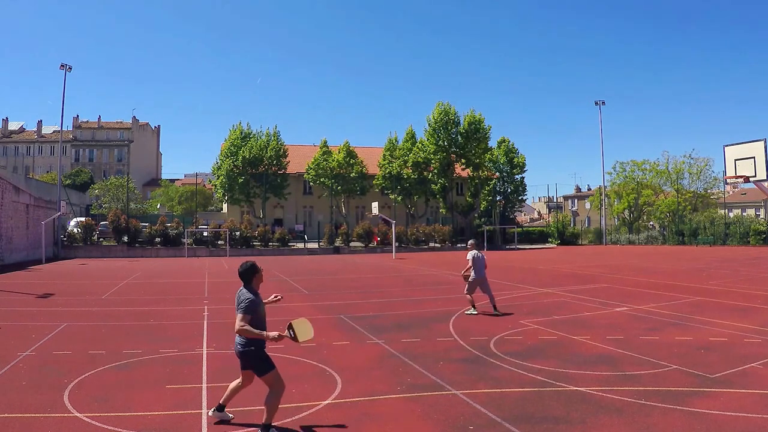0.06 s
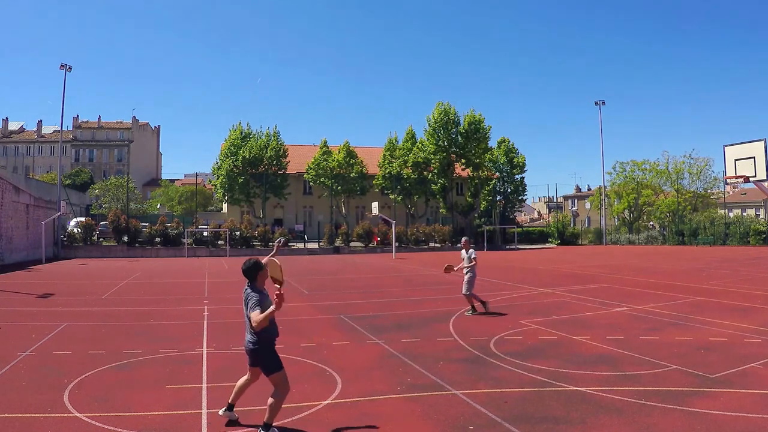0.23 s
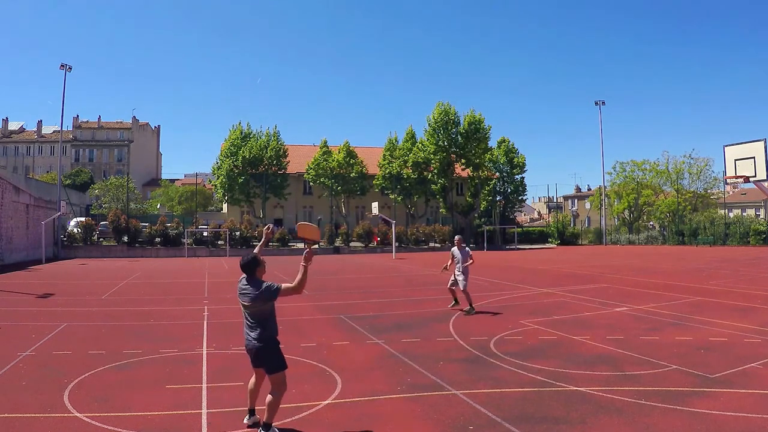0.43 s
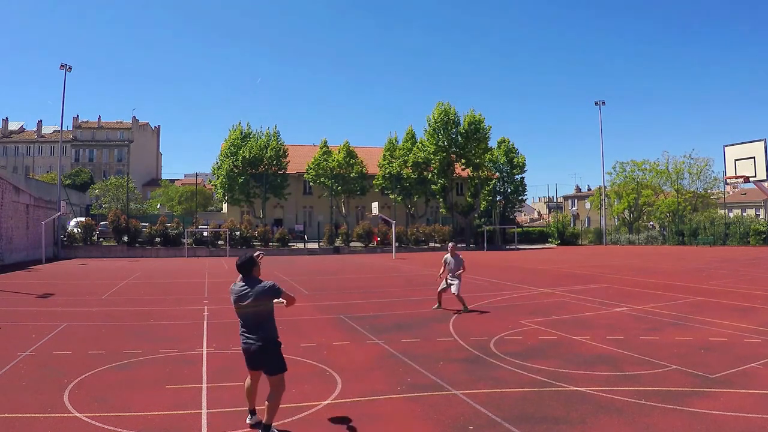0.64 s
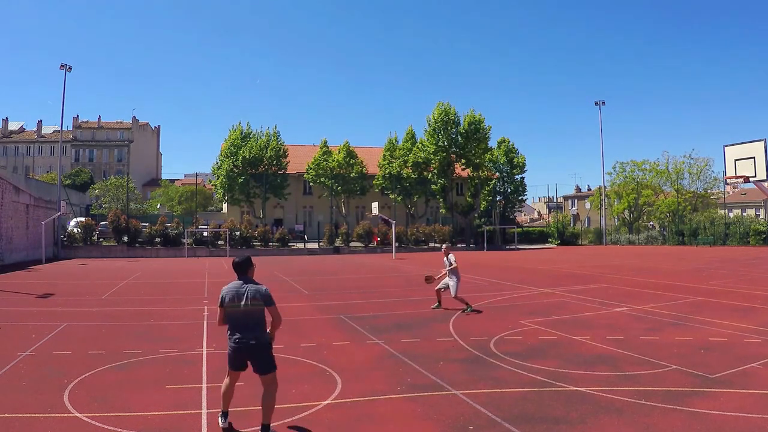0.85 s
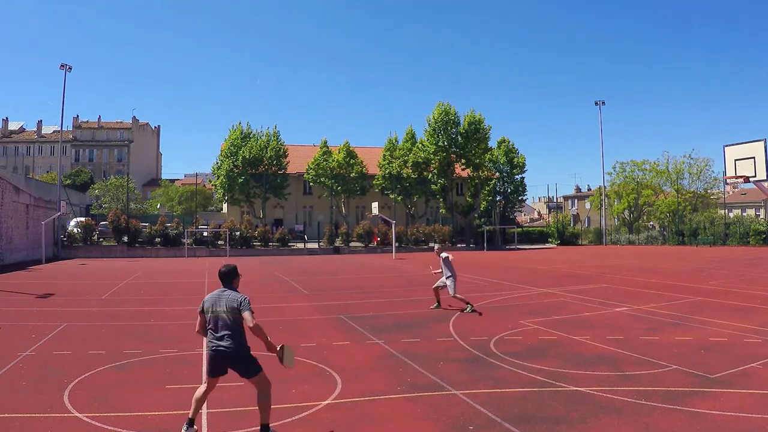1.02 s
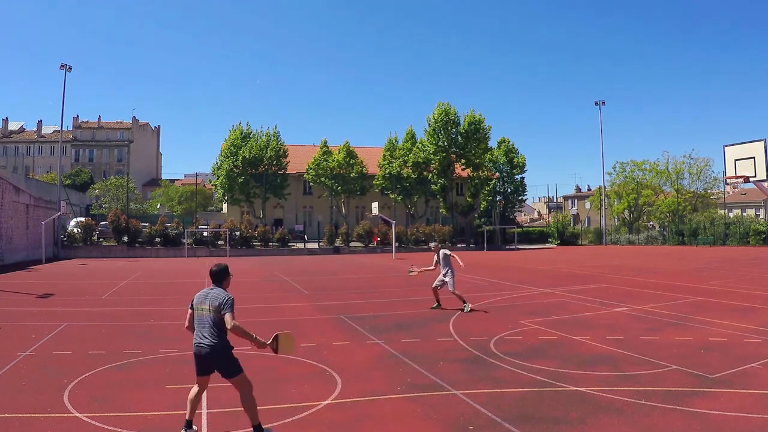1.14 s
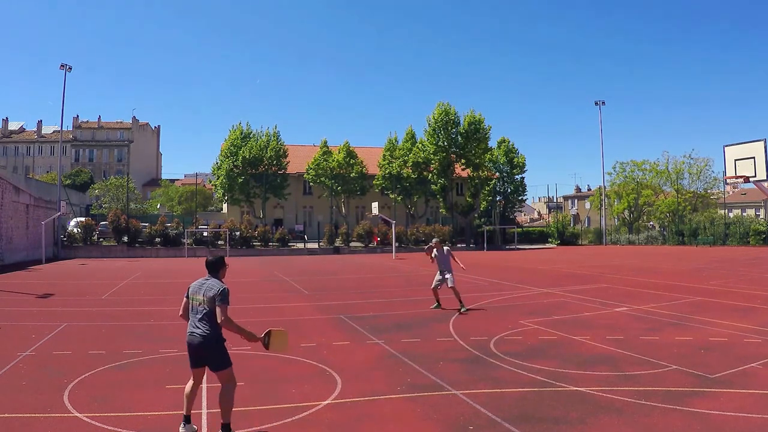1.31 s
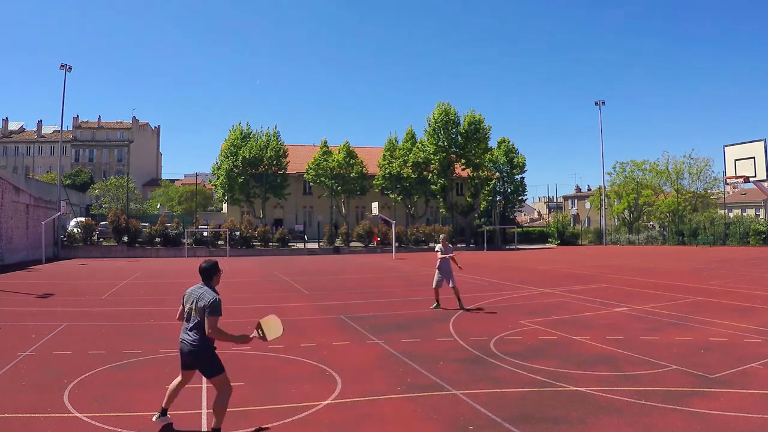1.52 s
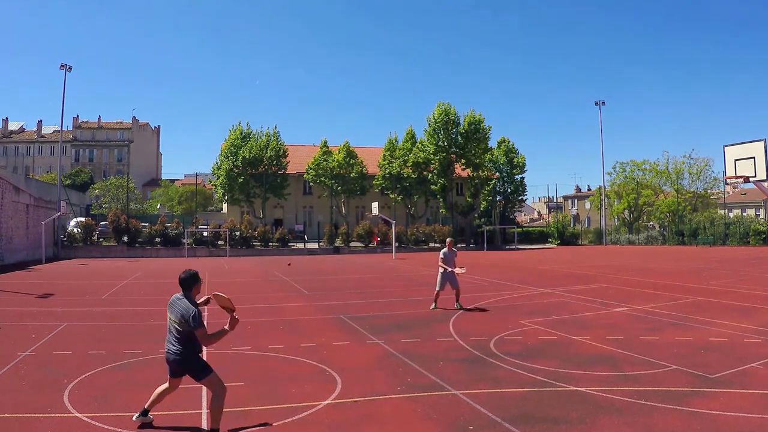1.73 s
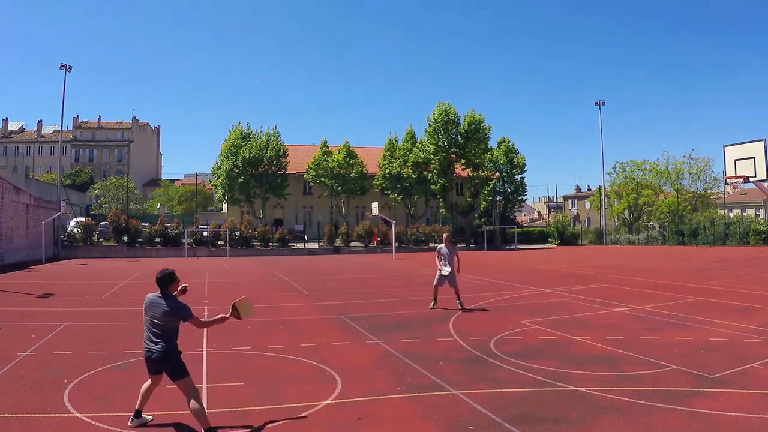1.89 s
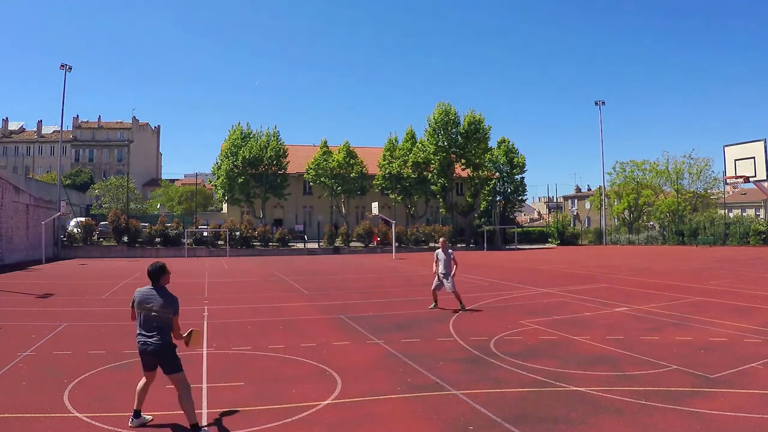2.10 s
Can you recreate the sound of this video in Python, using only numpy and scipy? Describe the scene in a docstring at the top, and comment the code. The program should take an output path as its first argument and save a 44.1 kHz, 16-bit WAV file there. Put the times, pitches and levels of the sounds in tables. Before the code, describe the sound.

Wooden paddles hit a ball back and forth in three sharp knocks, near, far, then near, each with a brief echo across an outdoor court. Gusts of wind rumble and thump on the microphone throughout.

```python
"""Two players knock a ball back and forth with hard wooden paddles on an open outdoor court.
Each stroke is a sharp crack and a short ring of the blade, thrown back by the ground and the walls around.
Gusts buffet the microphone over a faint wash of distant traffic."""
import sys
import numpy as np
from scipy import signal
from scipy.fft import rfft, irfft, next_fast_len
from scipy.io import wavfile
from scipy.ndimage import uniform_filter1d

SR = 44100
rng = np.random.default_rng(int(sys.argv[2]) if len(sys.argv) > 2 else 0)


def generate_wav(signal):
    """Clip the signal to [-1, 1] and save it as 16-bit WAV at the path in sys.argv[1]."""
    frames = np.transpose(np.atleast_2d(signal))
    scaled = np.clip(frames, -1, 1) * 32767
    pcm = np.round(scaled).astype(np.int16)
    wavfile.write(sys.argv[1], SR, pcm)


N = 94815

# strokes of the near player: (s, level dB, ring dB, blade pitch ratio, treble dB per octave, ground echo dB, near wall echo dB, far wall echo dB, court tail dB)
NEAR_STROKES = [(0.5139, 0.5, 4, 1.005, -1, -6, -10.5, -19, -19.5), (1.8719, -4, 6.5, .985, 0.28, -1.5, -4.5, -18.5, -17)]
# strokes of the far player: same columns
FAR_STROKES = [(1.2687, 0, 0, 0.96, 0, -3.5, -8.5, -15.5, -13.5)]
# what each blade rings with: (Hz, dB, t60 s)
NEAR_BLADE = [(430, -30, .03), (692, -19, .048), (900, -26, .024), (1040, -22, .026), (1510, -27, .02), (2275, -28, .02), (4565, -48, .035), (5286, -42, .012), (6770, -49, .026)]  # fixed
FAR_BLADE = [(819, -15, 0.027), (948, -25, .018), (1830, -22.5, 0.011), (4320, -55, 0.0069), (5500, -36, 0.0086), (8900, -66, .008)]
# crack of the contact: (Hz, dB)
NEAR_CRACK = [(100, 9), (250, 18), (500, 19), (950, 23.5), (1600, 18), (2400, 14.5), (3300, 5.5), (5500, 4.5), (9500, -3.5), (12500, -10.5), (15000, -16.5), (17000, -27)]
FAR_CRACK = [(100, -13.5), (300, 14.5), (600, 18.5), (1000, 14.5), (1900, 12.5), (3300, 0.5), (5500, -1.5), (9500, -14), (12500, -21), (15000, -26), (17000, -39)]
GROUND_EDGE_HZ, FAR_WALL_EDGE_HZ = 3150, 6300
# wind on the microphone: (s, level of the rumble dB, level of the flutter above it dB)
WIND = [(0.0, -36, -57), (0.02, -38, -59), (0.17, -39.5, -54), (0.23, -19, -23), (0.29, -17, -36), (0.33, -16, -24),
        (0.42, -26, -45), (0.48, -38, -52), (0.53, -25, -30), (0.6, -33, -53), (0.65, -17, -31), (0.68, -24, -44),
        (0.71, -19, -23), (0.78, -22, -48), (0.84, -23, -43), (0.93, -30, -54), (1.02, -21, -29), (1.05, -20, -41),
        (1.14, -32, -52), (1.18, -17, -34), (1.38, -26, -46), (1.41, -18, -35), (1.48, -26, -50), (1.63, -22, -47),
        (1.66, -31, -58), (1.76, -23, -45.5), (1.85, -40, -60), (1.87, -31, -38), (1.99, -35, -60), (2.15, -43, -52)]
RUMBLE = [(12, -13.5), (25, -1), (45, -1.5), (70, -6), (105, -10.5), (150, -24.5), (250, -47.5), (500, -82.5), (3000, -140)]
FLUTTER = [(60, -20.5), (120, 9.5), (170, 2.5), (250, -8), (350, -21), (500, -31), (800, -42.5), (3000, -120)]
RUMBLE_DB, FLUTTER_DB, WIND_EVEN_S = 1, -2.5, 0.035
TRAFFIC = [(60, -18.5), (250, 2.5), (500, 3), (900, -1), (1600, -7.5), (3000, -15.5), (6000, -22), (10000, -26.5), (14500, -31), (16000, -56.5)]
TRAFFIC_DB = -55.5
# shoes scuffing the court: (s, length s, dB, centre Hz)
SCUFFS = [(0.383, .11, -56, 1600), (0.733, 0.019, -57, 3430), (1.065, 0.035, -55.5, 1480), (1.451, 0.014, -56.5, 2900), (2.13, 0.11, -60, 1840)]
CUTOFF_HZ = 16200  # fixed
TIME = np.arange(N) / SR
SIZE = next_fast_len(N)
FREQS = np.arange(SIZE // 2 + 1) * SR / SIZE
# the dense upper modes of a blade: (dB against the crack, t60 s, lower edge Hz)
UPPER_MODES = (-7.5, 0.017, 3400)
TAIL_LOW_EDGE_HZ = 455
# wind on the microphone: (s, level of the rumble dB)
GUSTS = [(0.0, -40.5), (0.02, -39), (0.2, -30), (0.23, -20), (0.3, -19.5), (0.35, -15.5), (0.4, -25), (0.48, -36.5),
         (0.54, -25), (0.6, -33), (0.64, -21), (0.83, -28), (0.85, -21), (0.93, -29), (1.04, -17), (1.13, -34),
         (1.2, -19), (1.26, -33.5), (1.3, -23), (1.36, -28.5), (1.41, -19), (1.53, -35.5), (1.54, -28), (1.78, -34),
         (1.83, -43), (2.04, -36), (2.07, -40), (2.15, -43.5)]
# level of the flutter above the rumble: (s, dB)
FLUTTER_LEVEL = [(0.0, -45), (0.17, -54.5), (0.23, -20.5), (0.29, -30), (0.32, -22.5), (0.38, -29), (0.42, -42.5),
                 (0.46, -33.5), (0.48, -53), (0.51, -47.5), (0.57, -25), (0.6, -80), (0.65, -27), (0.68, -63),
                 (0.71, -17.5), (0.78, -37.5), (0.87, -33.5), (0.91, -66), (1.01, -25), (1.14, -59), (1.18, -25),
                 (1.39, -43.5), (1.41, -31), (1.46, -44), (1.63, -36), (1.65, -48), (1.84, -55), (1.87, -44.5),
                 (2.01, -75), (2.15, -49)]
# single eddies that thump the microphone: (s, peak dB, Hz)
BUFFETS = [(.233, -10, 135), (.262, -16, 85), (.329, -14, 180), (.346, -8, 42), (.368, -22, 170), (.646, -13, 80), (.710, -14, 175)]  # fixed
# echo delays of each stroke, set by where the ball is met: (ground ms, near wall ms, far wall ms)
NEAR_DELAYS = [(4.55, 11.9, 71.6), (1.3, 11.7, 68.5)]  # fixed
FAR_DELAYS = [(.95, 11.3, 64.6)]  # fixed
# reflections after every stroke, the first being the near wall's echo bounced off the ground, the rest lesser
# reflectors round the court: delays (ms), and for each (dB, treble edge Hz)
REFLECTOR_DELAYS_MS = [14.8, 20.3, 45.2, 99.0]  # fixed
REFLECTORS = [(-10.5, 3000), (-31, 5600), (-24, 2500), (-23.5, 2500)]
FAR_WALL_FOOT_DB = 0.5
FAR_WALL_FOOT_S = .003  # fixed
# diffuse sound, from things close by and from the houses round the court
SCATTER_ONSET_S, SCATTER_RISE_S, TAIL_ONSET_S, TAIL_RISE_S = .011, .002, .02, .02  # fixed
SCATTER_DB, SCATTER_T60_S, SCATTER_EDGE_HZ = 1, 0.046, 2800   # level against the near wall echo
TAIL_T60_S, TAIL_EDGE_HZ = 0.91, 4600
MS = .001  # fixed
NEAR_WALL_DB = None
NEAR_WALL_EDGE_HZ = 3100
FAR_WALL_LOW_EDGE_HZ = 170
GRIT_DB, GRIT_HZ = 2.5, 120
ECHO_RING_DB = -2   # the blade beams its ring, so the walls get less of it than of the crack
FAR_WALL_SCATTER_DB = 3
FAR_WALL_SCATTER_T60_S, FAR_WALL_SCATTER_RISE_S = .028, .001  # fixed


def from_db(db):
    """Decibels to gain."""
    return 10 ** (np.asarray(db) / 20)


def gain_curve(points):
    """Gain at every frequency from (Hz, dB) points."""
    hz, db = np.transpose(points)
    return from_db(np.interp(np.log(FREQS + 1), np.log(hz), db))


def noise(gain):
    """Coloured noise of rms 1."""
    x = irfft(rfft(rng.standard_normal(SIZE)) * gain, SIZE)[:N]
    return x / x.std()


def crack(points):
    """The shortest causal pulse with this spectrum."""
    cepstrum = irfft(np.log(gain_curve(points)), SIZE)
    cepstrum[1:SIZE // 2] *= 2
    cepstrum[SIZE // 2 + 1:] = 0
    return np.exp(rfft(cepstrum))


def echo(delay_s, db, edge_hz):
    """Response of one reflection: later, weaker and duller."""
    return from_db(db) * np.exp(-2j * np.pi * FREQS * delay_s) / (1 + 1j * FREQS / edge_hz)


def scatter(rise_s, t60):
    """Response of countless small reflections that swell and die; energy 1."""
    x = rng.standard_normal(N) * (1 - np.exp(-TIME / abs(rise_s))) * from_db(-60 * TIME / t60)
    return rfft(x / np.sqrt(np.sum(x ** 2)), SIZE)


def court(near_ms, far_ms, near_db, far_db, tail_db):
    """Slaps from the near and far walls, scatter from things close by and the tail of the court."""
    face = 1 + echo(FAR_WALL_FOOT_S, FAR_WALL_FOOT_DB, FAR_WALL_EDGE_HZ) + from_db(FAR_WALL_SCATTER_DB) * scatter(FAR_WALL_SCATTER_RISE_S, FAR_WALL_SCATTER_T60_S)
    far = echo(far_ms * MS, far_db, FAR_WALL_EDGE_HZ) * face * high_pass(FAR_WALL_LOW_EDGE_HZ) / (1 + 1j * FREQS / FAR_WALL_EDGE_HZ)
    close = diffuse(SCATTER_ONSET_S, SCATTER_RISE_S, near_db + SCATTER_DB, SCATTER_T60_S, SCATTER_EDGE_HZ)
    tail = diffuse(TAIL_ONSET_S, TAIL_RISE_S, tail_db, TAIL_T60_S, TAIL_EDGE_HZ) * high_pass(TAIL_LOW_EDGE_HZ) ** 2
    return echo(near_ms * MS, near_db, NEAR_WALL_EDGE_HZ) + far + close + tail


def paddle(strokes, delays, blade, contact, reflectors):
    """The ball cracks on the blade and sets its modes ringing; ground and walls throw the sound back."""
    out, pulse, t = np.zeros(N), crack(contact), TIME[:SR // 10]
    upper_db, upper_t60, upper_hz = UPPER_MODES
    for (s, db, ring_db, pitch, treble_db, ground_db, near_db, far_db, tail_db), (ground_ms, near_ms, far_ms) in zip(strokes, delays):
        modes = sum(from_db(level - 60 * t / t60) * np.sin(2 * np.pi * hz * pitch * t) for hz, level, t60 in blade)
        ring = -from_db(ring_db) * rfft(modes, SIZE)
        upper = from_db(upper_db) * scatter(0.00019, upper_t60) * high_pass(upper_hz) ** 2
        treble = from_db(treble_db * np.log2(1 + FREQS / 1000))  # fixed
        snap = pulse * treble * (1 + upper)
        direct = (snap + ring) * (1 + echo(ground_ms * MS, ground_db, GROUND_EDGE_HZ))
        echoes = (snap + from_db(ECHO_RING_DB) * ring) * (reflectors + court(near_ms, far_ms, near_db, far_db, tail_db))
        start = int(s * SR)
        out[start:] += from_db(db) * irfft(direct + echoes, SIZE)[:N - start]
    return out


def eddies(spectrum):
    """Low turbulence with its chance swells evened out."""
    x = noise(gain_curve(spectrum))
    return x / np.sqrt(uniform_filter1d(uniform_filter1d(x ** 2, int(WIND_EVEN_S * SR)), int(WIND_EVEN_S * SR)) + 1e-9)


def wind():
    """Gusts rumble and flutter on the microphone; each single eddy is one swing of pressure."""
    rumble = from_db(RUMBLE_DB + np.interp(TIME, *np.transpose(GUSTS))) * eddies(RUMBLE)
    flutter = from_db(FLUTTER_DB + np.interp(TIME, *np.transpose(FLUTTER_LEVEL))) * eddies(FLUTTER)
    thumps = 0
    for s, db, hz in BUFFETS:
        u = np.clip(2 * np.pi * hz * (s - TIME), -10, 10)
        thumps = thumps + from_db(db) * u * np.exp((1 - u ** 2) / 2)
    return rumble + flutter + thumps


def shoes():
    """Faint, gritty swells of sole friction."""
    grit = from_db(GRIT_DB * noise(np.exp(-FREQS / GRIT_HZ)))
    return grit * sum(from_db(db) * np.exp(-2 * np.minimum(((TIME - s) / length) ** 2, 20)) * noise(np.exp(-2 * np.log2((FREQS + 1) / hz) ** 2))
                      for s, length, db, hz in SCUFFS)


def high_pass(edge_hz):
    """Response that thins out the bass."""
    return 1j * FREQS / (edge_hz + 1j * FREQS)


def diffuse(onset_s, rise_s, db, t60, edge_hz):
    """A late, dull wash of reflections."""
    return echo(onset_s, db, edge_hz) * scatter(rise_s, t60)


def scene():
    """The rally, the wind and the town behind."""
    reflectors = sum(echo(ms * MS, db, hz) for ms, (db, hz) in zip(REFLECTOR_DELAYS_MS, REFLECTORS))
    near = paddle(NEAR_STROKES, NEAR_DELAYS, NEAR_BLADE, NEAR_CRACK, reflectors)
    far = paddle(FAR_STROKES, FAR_DELAYS, FAR_BLADE, FAR_CRACK, reflectors)
    traffic = from_db(TRAFFIC_DB) * noise(gain_curve(TRAFFIC))
    return (near + far + wind() + shoes() + traffic)[None]


def record(dry):
    """The top is cut steeply."""
    return signal.sosfilt(signal.cheby2(12, 70, CUTOFF_HZ + 1000, fs=SR, output="sos"), dry)  # fixed


dry = scene()
out = record(dry)
generate_wav(out)
```